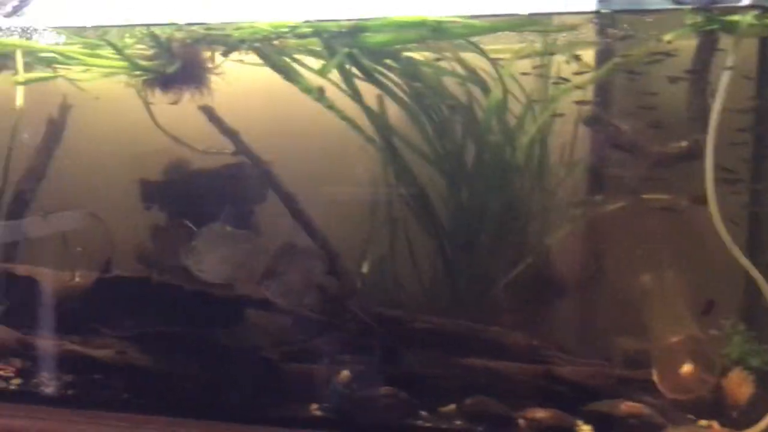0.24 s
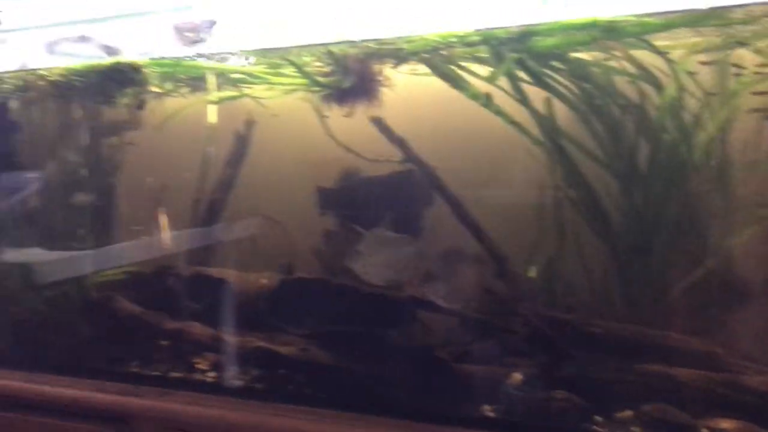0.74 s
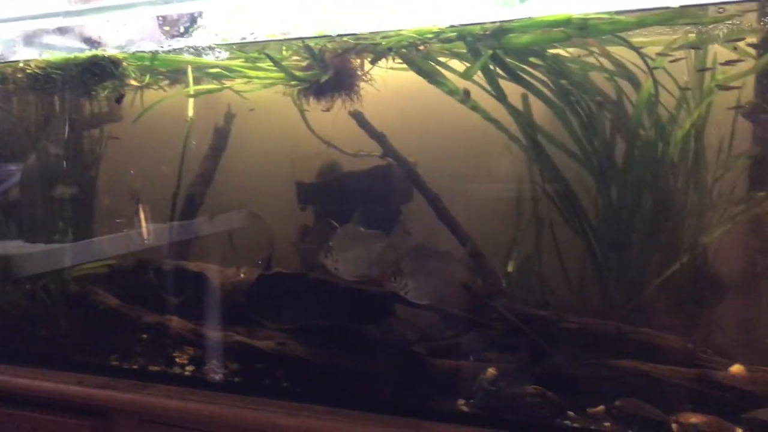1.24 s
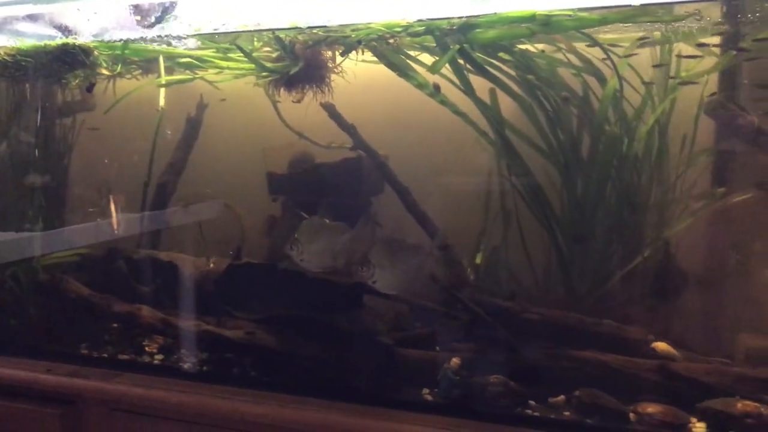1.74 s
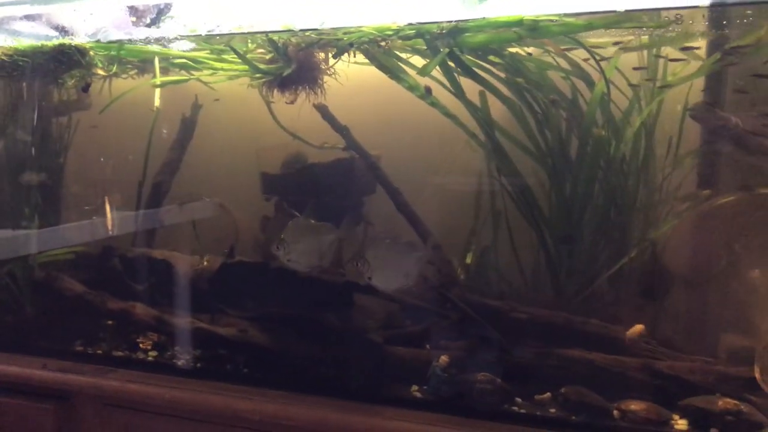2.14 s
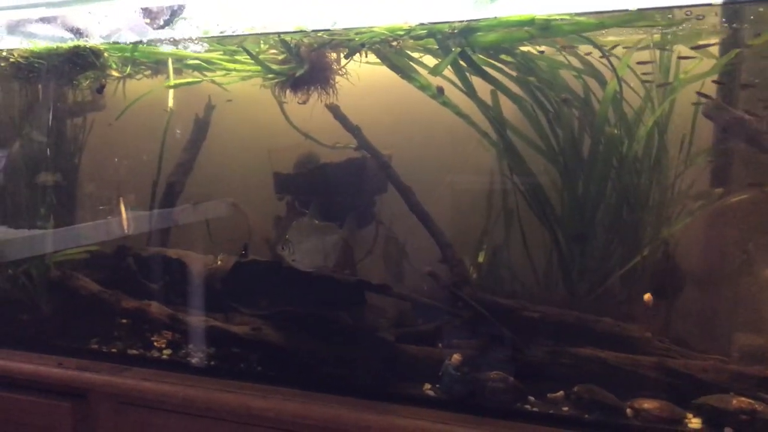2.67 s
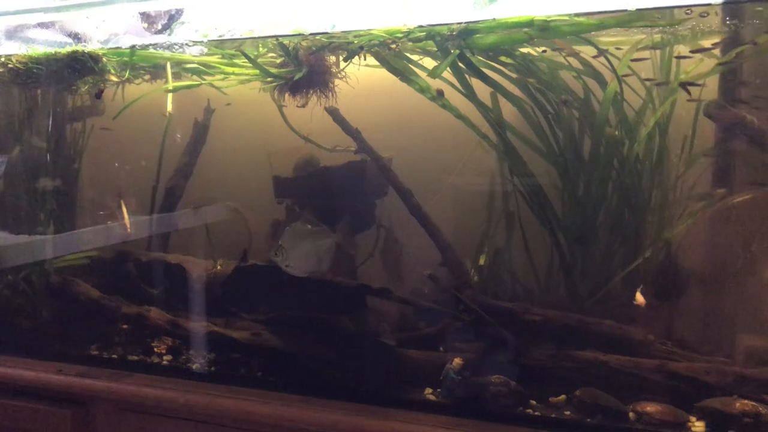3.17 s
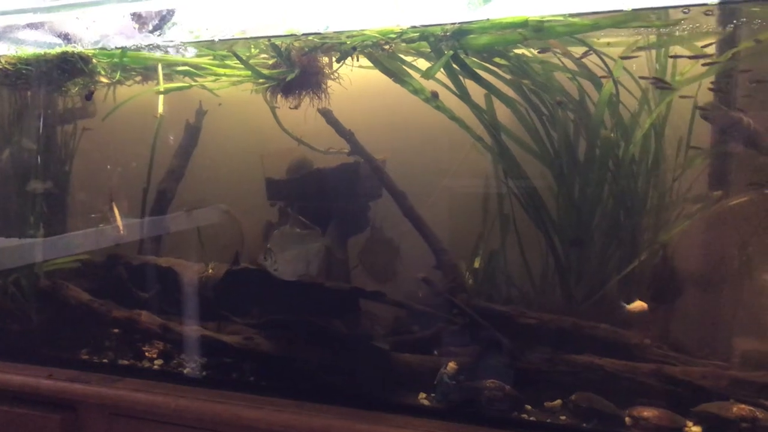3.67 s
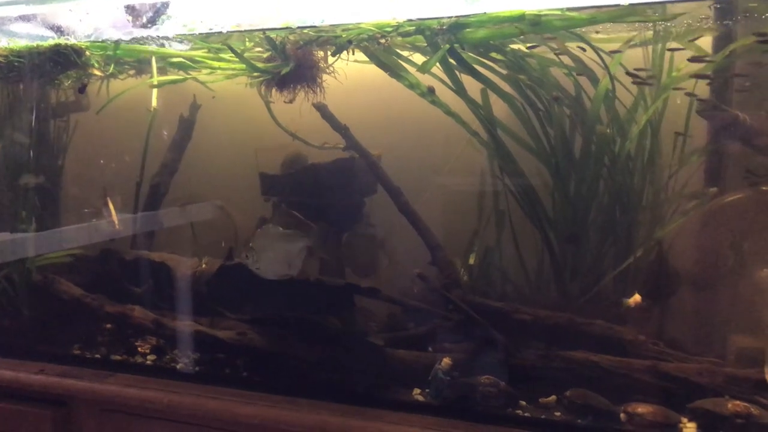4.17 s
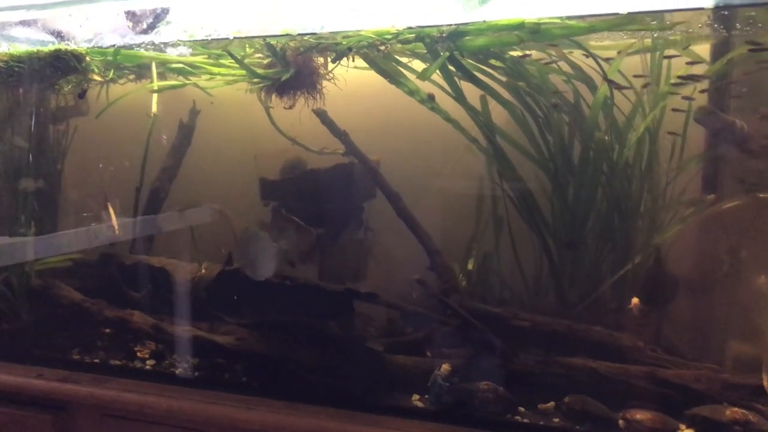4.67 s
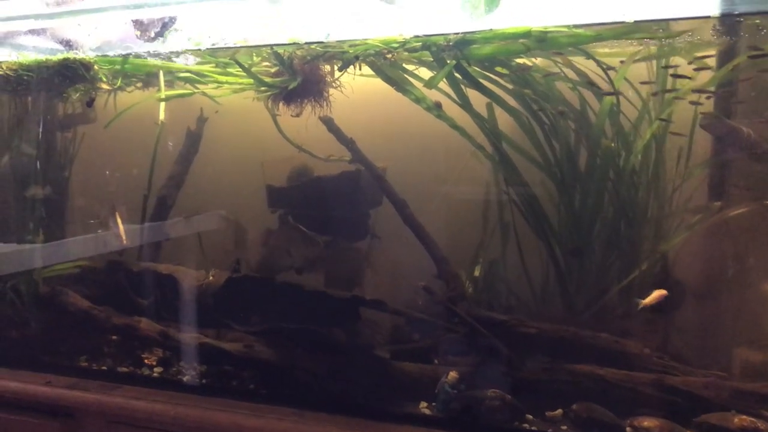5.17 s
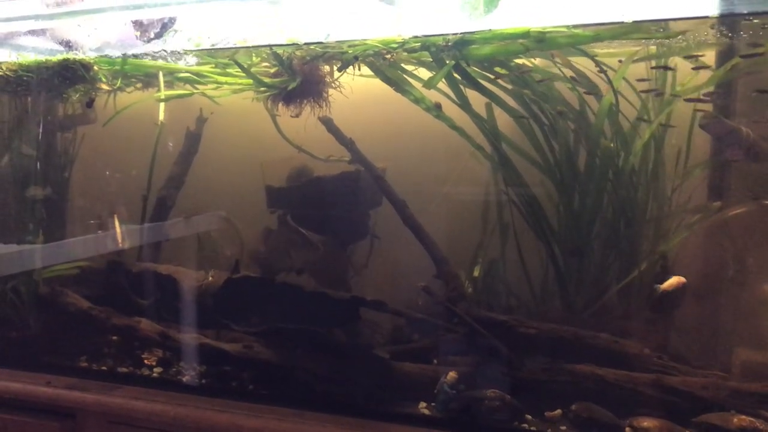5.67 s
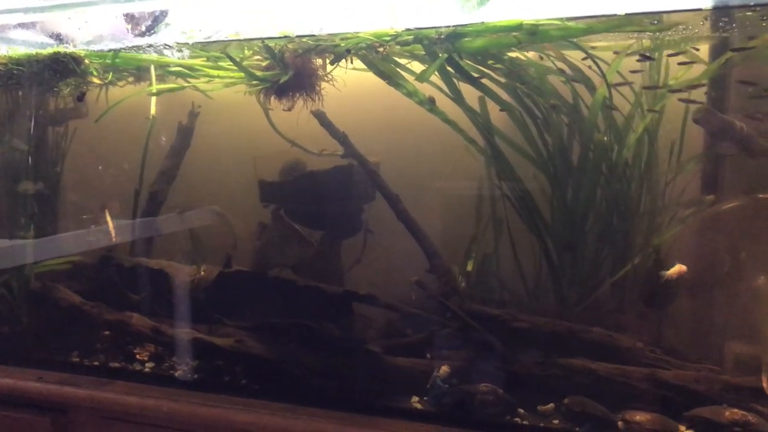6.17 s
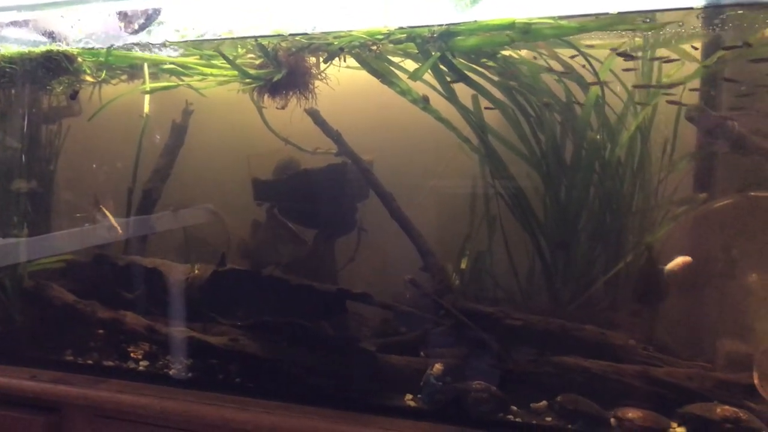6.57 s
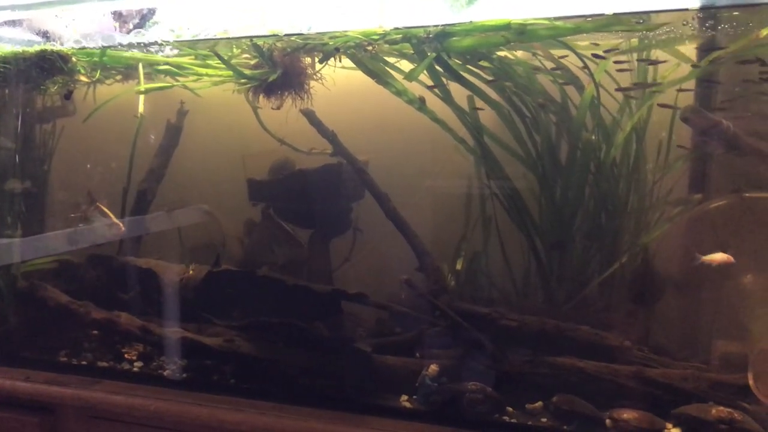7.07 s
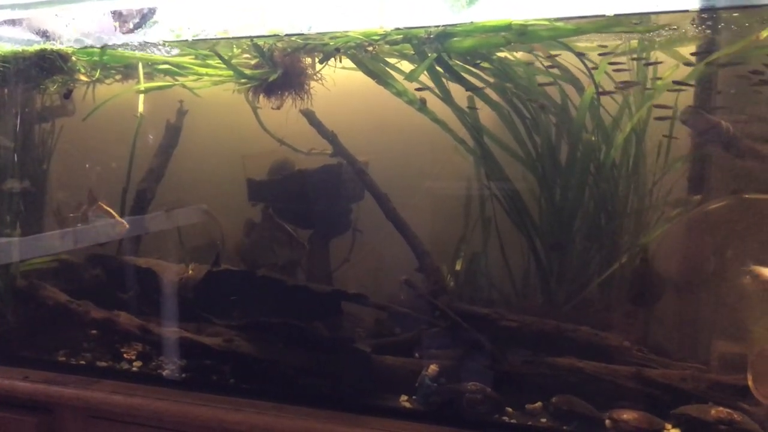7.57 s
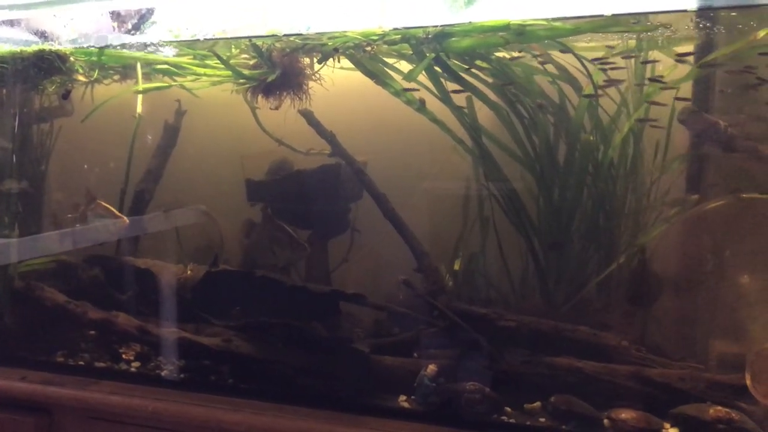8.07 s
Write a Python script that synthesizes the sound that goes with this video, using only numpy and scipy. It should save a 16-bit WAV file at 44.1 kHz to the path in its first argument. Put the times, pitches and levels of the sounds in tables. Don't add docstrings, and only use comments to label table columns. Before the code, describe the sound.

A steady, irregular trickle of water falls back into a covered fish tank, bubbling and popping without pause, with small room echoes. The microphone is near, so droplets sound crisp over a quiet electrical hum and hiss. Far vehicles murmur low; after three seconds one muffled engine outside wavers, strengthens, rises in pitch and dies away while the water carries on.

```python
import sys
import numpy as np
from scipy import signal
from scipy.fft import rfft, irfft
from scipy.io import wavfile
from scipy.ndimage import uniform_filter1d

SR = 44100
rng = np.random.default_rng(int(sys.argv[2]) if len(sys.argv) > 2 else 0)


def digitize_waveform(pressure):
    field = np.atleast_2d(pressure).T
    bounded = np.clip(field, -1, 1)
    quanta = np.round(bounded * 32767).astype(np.int16)
    wavfile.write(sys.argv[1], SR, quanta)


def invert_db(x):
    u = np.asarray(x, float) / 20
    return 10 ** u


N = 366912


def evened(x):
    return x / np.sqrt(np.mean(x ** 2) + 1e-20)


def read(points, hz):
    f, value = np.transpose(points)
    return np.interp(np.log(hz + 1), np.log(f + 1), value)


def columns(rows):
    s, *rest = np.transpose(rows)
    return [np.interp(np.arange(N) / SR, s, c) for c in rest]


def drift(hz, lowest=0.0477):
    t = np.arange(0, N + 256, 256) / SR
    slow = 0
    for f in hz * np.geomspace(lowest, 1, 20):
        slow = slow + np.sin(2 * np.pi * (f * t + rng.random())) / np.sqrt(f)
    return np.interp(np.arange(N) / SR, t, evened(slow))


def tone(hz, db):
    cycles = np.cumsum(hz * np.ones(N)) / SR + rng.random()
    return np.sqrt(2) * invert_db(db) * np.sin(2 * np.pi * cycles)


def lasting(rows, fade_s=0.16):
    t = np.arange(N) / SR
    inside_s = np.minimum(t - rows[0][0], rows[-1][0] - t)
    return np.clip(inside_s / fade_s + 1, 0, 1)


def bubble(hz, cycles, glide, rise=0.25):
    turns = np.arange(1024) / SR * hz
    ring = np.sin(2 * np.pi * turns * (1 + glide * np.minimum(turns / cycles, 2)))
    return ring * np.exp(-turns / cycles) * (1 - np.exp(-turns / rise))


def lesser(peak_db, spread_db, low_hz, high_hz, count=32):
    when, strength, size = rng.random((count, 3)).T
    start_s = (np.arange(count) + when) * N / SR / count
    level_db = peak_db + spread_db * (2 * strength - 1)
    pitch_hz = low_hz * (high_hz / low_hz) ** size
    return np.transpose([start_s, level_db, pitch_hz]).tolist()


def pops(rows, ways, cycles, glide):
    out = np.zeros(N + SR)
    varied = rng.uniform(.65, 1.3, (len(rows), 2))
    for k, ((start_s, level_db, pitch_hz), vary) in enumerate(zip(rows, varied)):
        ring = bubble(pitch_hz, cycles * vary[0], glide * vary[1])
        heard = signal.fftconvolve(ring, ways[k % len(ways)])
        out[round(start_s * SR):][:len(heard)] += invert_db(level_db) * heard / abs(heard).max()
    return out[:N]


def large_bubbles(ways):
    # start_s, level_db (peak), pitch_hz
    plops = [(0.322, -50, 743), (0.733, -42.5, 873), (0.852, -46.5, 864), (0.94, -47.5, 820),
             (1.261, -52, 824), (2.037, -47.5, 805), (2.121, -55, 790), (3.088, -49, 796),
             (3.376, -56, 720), (3.557, -46, 804), (3.689, -51, 845), (3.966, -46.5, 760),
             (3.986, -43, 790), (4.23, -50, 780), (4.399, -52, 760), (4.518, -47, 760), (4.569, -55, 790),
             (4.624, -42.5, 807), (4.668, -45.5, 820), (4.923, -49, 770), (4.945, -49, 768),
             (5.0, -45, 745), (5.205, -48, 840), (5.239, -47.5, 774), (5.791, -50.5, 780),
             (6.069, -45.5, 818), (6.269, -48, 760), (6.68, -48, 878), (7.169, -55, 750), (7.398, -48, 792)]
    # start_s, level_db (peak), pitch_hz
    gulps = [(1.03, -46.5, 1140), (0.6252, -41, 1092), (0.9495, -47, 1095), (1.1056, -47, 1124),
             (1.2843, -40.5, 1105), (1.3299, -39.5, 1165), (1.4005, -44, 1160), (1.5198, -41.5, 1084),
             (2.1785, -42.5, 1024), (2.2949, -43, 1060), (2.4753, -44.5, 1006), (3.1738, -43.5, 1130),
             (3.2249, -40.5, 1111), (3.3112, -42, 1040), (3.3989, -43, 1103), (3.6199, -41, 1273),
             (3.6937, -42.5, 1130), (3.828, -41.5, 1070), (4.7364, -35.5, 1100), (4.808, -46, 1107),
             (4.9816, -43.5, 1130), (5.2118, -35.5, 1142), (5.9357, -48, 1040), (6.077, -43.5, 1075),
             (6.2543, -41, 1250), (6.6167, -43, 1136), (7.1151, -40, 1130), (7.2808, -42, 1096),
             (7.6818, -44.5, 1130), (8.0207, -40.5, 1033)]
    gulps = gulps + lesser(-48, 4.5, 902, 1297)
    return pops(plops, ways, 8.7, 0.019) + pops(gulps, ways, 7.3, 0.011)


def small_bubbles(ways):
    # start_s, level_db (peak), pitch_hz
    plinks = [(0.2406, -44.5, 4000), (0.4234, -42, 2640), (0.5501, -46.5, 1890), (0.5927, -44.5, 1580),
              (0.9867, -41.5, 3450), (1.798, -44, 4440), (2.156, -41, 2920), (2.4604, -38, 1900),
              (2.6377, -39.5, 2430), (2.7811, -45, 3530), (2.8155, -41, 3040), (2.9913, -45.5, 4110),
              (3.0907, -43, 2440), (3.258, -47, 2730), (3.4972, -37.5, 4360), (7.0778, -44, 2300),
              (4.7982, -39.5, 4200), (4.8459, -48, 4970), (5.019, -42.5, 2580), (5.5737, -46.5, 1970),
              (5.808, -43.5, 3900), (6.0735, -44.5, 4920), (6.2422, -47, 2700), (6.6303, -42, 2610),
              (6.9611, -46, 2440), (7.0173, -44.5, 2870), (7.3038, -38.5, 3180), (7.5873, -44.5, 3660),
              (7.9688, -46, 2690), (8.1276, -41, 4180)]
    # start_s, level_db (peak), pitch_hz
    ticks = [(0.0403, -44, 6430), (0.0742, -40.5, 6800), (0.4289, -43, 6700), (0.5826, -36, 15000),
             (0.6355, -40, 6400), (0.8096, -42, 12150), (0.8999, -33.5, 10600), (1.2585, -42, 11200),
             (1.3947, -36.5, 10800), (1.6496, -41, 9200), (1.6791, -40, 14700), (1.8821, -41, 7300),
             (1.944, -38, 11300), (2.5022, -37.5, 12700), (2.5865, -40, 14600), (2.8444, -44, 12270),
             (2.9856, -39, 6050), (3.0784, -36.5, 11000), (3.5828, -42, 6360), (7.3896, -43, 15300),
             (4.6952, -34.5, 7600), (4.9112, -43, 12800), (5.1517, -40, 8900), (5.5872, -39.5, 6130),
             (6.2736, -43, 8490), (6.3674, -38, 15300), (7.2055, -44, 14500), (6.982, -43, 8330),
             (7.2055, -42.5, 6460), (8.2501, -33, 15300)]
    plinks = plinks + lesser(-51.5, -1, 2300, 4600)
    ticks = ticks + lesser(-50.5, 6.5, 5994, 10000)
    return pops(plinks, ways, 3.06, 0.024) + pops(ticks, ways, 2.8, 0.015)


def shower(per_s, spread_db):
    at = rng.random(N) < per_s / SR
    train = np.zeros(N)
    train[at] = invert_db(spread_db * np.minimum(rng.exponential(1, N)[at], 3.5))
    return train


def fizz(clump_db=1.43, count=40):
    # pitch_hz, level_db (per Hz)
    sizes = [(680, -32.5), (800, -22.5), (900, -1.5), (1100, -4.5), (1400, -8), (2200, -10), (3100, -14.5),
             (4300, -14.5), (7000, -18.5), (10000, -20.5), (15000, -15.5)]
    fizz_db, fizz_per_s, spray_db, spray_per_s = -57, 500, -68.5, 200
    knots_hz = [1300, 2600, 8000, 12000]
    out = np.zeros(N)
    for hz in np.geomspace(680, 15300, count):
        spread_db = np.interp(hz, knots_hz, [2.6, 3.74, 3.04, 1.9])
        density = np.interp(hz, knots_hz, [2.4, 1.3, 1.3, 3.5])
        train = shower(fizz_per_s / count * density, spread_db)
        ringing = signal.oaconvolve(train, bubble(hz, 7.53, 0.052))[:N]
        out += invert_db(read(sizes, hz)) * np.sqrt(hz) * evened(ringing)
    tick = bubble(10900, 0.92, 0.16, rise=0.12)
    spray = evened(signal.oaconvolve(shower(spray_per_s, 2.3), tick)[:N])
    both = invert_db(fizz_db) * evened(out) + invert_db(spray_db) * spray
    return both * invert_db(clump_db * drift(22, lowest=0.29))


def path(direct_db=-6.0, lid_db=2, split_hz=1400):
    # mode_hz, level_db, t60_s
    modes = [(689, 4, 0.1), (749.7, 2, 0.12), (784.8, 3.5, 0.14), (790.5, -15.5, 0.12), (878, 3.5, 0.097),
             (931, -2, 0.22), (965.6, 2.5, 0.12), (1000, -4, 0.17), (1057, -1, 0.16), (1072.7, -7, 0.31),
             (1111, 1.5, 0.17), (1130, -11, 0.43), (1208, -17, 0.39), (1241.7, 0.5, 0.17),
             (1198, -16, 0.058), (1252, -5, 0.094), (1400, -33, 0.1), (1447, -9, 0.3)]
    # band_hz, t60_s
    decay = [(1500, 0.19), (4000, 0.25), (9000, 0.2), (15000, 0.084)]
    t = np.arange(SR // 3) / SR
    lid = sum(invert_db(db - 60 * t / t60) * np.sin(2 * np.pi * hz * t) for hz, db, t60 in modes)
    lid *= 1 - np.exp(-t / .001)
    taps = np.zeros(len(t))
    at = np.arange(24, len(t) - 12, 12)
    taps[at + rng.integers(0, 12, len(at))] = rng.choice([-1., 1.], len(at))
    hz, when, z = signal.stft(taps, SR, nperseg=128)
    z = z * invert_db(-60 * when / read(decay, hz)[:, None])
    tail = signal.istft(z, SR, nperseg=128)[1][:len(t)]
    tail /= np.linalg.norm(tail)
    tail[0] += invert_db(direct_db)
    above = signal.sosfilt(signal.butter(4, split_hz, "high", fs=SR, output="sos"), tail)
    share = np.sqrt(2 * 700 / SR)
    return above + invert_db(lid_db) * share * lid / np.linalg.norm(lid)


def wander(x, ways, hz=7.0):
    turn = np.pi * hz * np.arange(N) / SR
    out = np.zeros(N)
    for k, way in enumerate(ways):
        share = np.cos(turn + np.pi * k / len(ways)) ** 2
        out += signal.oaconvolve(x * share, way / np.linalg.norm(way))[:N]
    return out


def engine_outside():
    # time_s, speed_hz (cycles per s)
    pace = [
        (3.2, 13.5),
        (4.2, 13.1),
        (4.5, 13.5),
        (5.7, 14.65),
        (6.75, 16.8),
        (7.15, 17.3),
        (7.5, 18.9),
        (7.9, 19.2),
        (8.32, 20.7),
    ]
    # time_s, level_db (rms)
    effort = [
        (3.2, -58),
        (3.42, -49.5),
        (4.0, -47.5),
        (4.22, -56.5),
        (4.5, -48),
        (5.1, -45.5),
        (6.35, -45),
        (7.35, -58.5),
        (7.7, -76),
    ]
    # order, level_db (rms at the boom)
    side_orders = [(7, -54), (6, -58), (5, -58)]
    # order, level_db (rms)
    weak_orders = [(3, -68), (4, -70), (9, -66), (11, -68), (13, -70)]
    # centre_hz, width_hz
    wall = [(58, 20), (146, 8), (245, 9)]
    firing_order, boom_hz, boom_width_hz = 8, 108, 21
    (speed,), (firing_db,) = columns(pace), columns(effort)
    speed = uniform_filter1d(speed, SR // 8)
    engine = tone(firing_order * speed, firing_db + 1.56 * drift(12, lowest=0.2))
    uneven_db = 3 * np.minimum(speed - 18, 0)
    for order, db in side_orders:
        boom = 1 / np.sqrt(1 + ((order * speed - boom_hz) / boom_width_hz) ** 4)
        engine += boom * tone(order * speed, db + uneven_db + 2.2 * drift(6))
    for order, db in weak_orders:
        passed = sum(1 / (1 + ((order * speed - hz) / width) ** 4) for hz, width in wall)
        engine += passed * tone(order * speed, db + 2 * drift(5))
    return engine * lasting(pace)


def drone(start_s, end_s, first_hz, last_hz, level_db):
    rows = [(start_s, first_hz), (end_s, last_hz)]
    return tone(columns(rows)[0], level_db + 2.5 * drift(2.5, lowest=0.183)) * lasting(rows)


def outside_drones():
    # start_s, end_s, first_hz, last_hz, level_db (rms)
    drones = [(0.0, 2.2, 54.5, 56.5, -58), (0.7, 2.5, 63.5, 65.8, -55.5), (0.0, 1.6, 38.8, 40.5, -74),
              (2.6, 4.2, 41.8, 41.5, -67), (2.9, 3.8, 56.3, 53, -60), (4.5, 5.4, 48, 56, -61),
              (5.7, 7.1, 53.5, 52, -65), (7.2, 8.3, 54, 55.4, -59), (3.2, 7.6, 66.2, 65, -67),
              (7.9, 8.3, 63.5, 62.3, -59), (0.1, 1.5, 110, 113, -65), (1.9, 2.6, 114, 107, -66)]
    return sum(drone(*row) for row in drones)


def pump():
    # pitch_hz, level_db (rms)
    hum = [(100, -73), (200, -74), (300, -74.5), (400, -94.5), (500, -80)]
    return sum(tone(hz, db + 0.54 * drift(2.46)) for hz, db in hum)


def air():
    # band_hz, level_db (per Hz)
    spectrum = [(20, -12), (45, -7), (75, -1.5), (120, 1.5), (165, -9), (300, -9.5), (355, -16.5),
                (570, -18.5), (1100, -6), (2200, -24.5), (4400, -20.5), (10000, -25.5), (16000, -35.5)]
    hz = np.fft.rfftfreq(N, 1 / SR)
    noise = irfft(rfft(rng.standard_normal(N)) * invert_db(read(spectrum, hz)), N)
    return invert_db(-57) * evened(noise)


def scene():
    ways = [path() for _ in range(3)]
    water = large_bubbles(ways) + small_bubbles(ways) + wander(fizz(), ways)
    return (water + engine_outside() + outside_drones() + pump() + air())[None]


def band_limit(x):
    return signal.sosfilt(signal.butter(12, 16670, fs=SR, output="sos"), x)


def record(dry):
    hz = np.fft.rfftfreq(N, 1 / SR)
    port_db = -5.0 * np.exp(-((hz - 10500) / 450) ** 2)
    low_dip_db = -2.1 * np.exp(-((hz - 2200) / 140) ** 2)
    edge_hz = 15830
    mix = irfft(rfft(dry) * invert_db(port_db + low_dip_db) * (hz < edge_hz), N)
    return band_limit(mix)


dry = scene()
out = record(dry)
digitize_waveform(out)
```